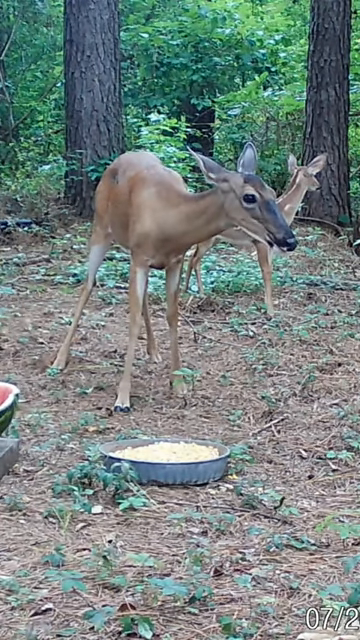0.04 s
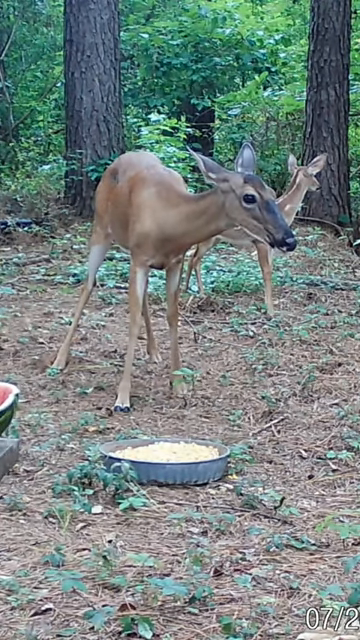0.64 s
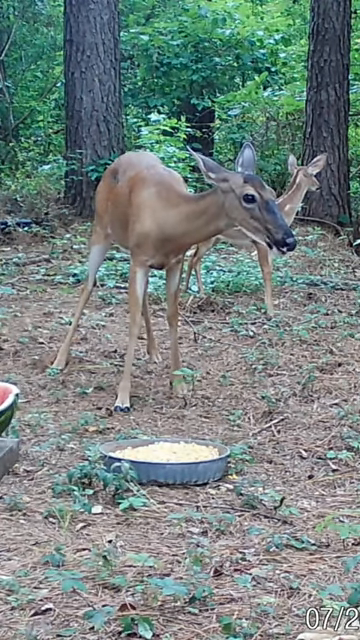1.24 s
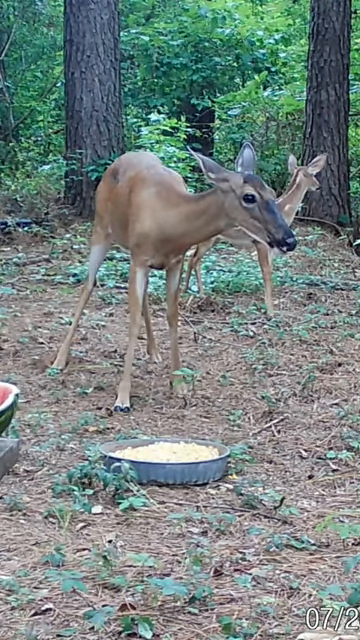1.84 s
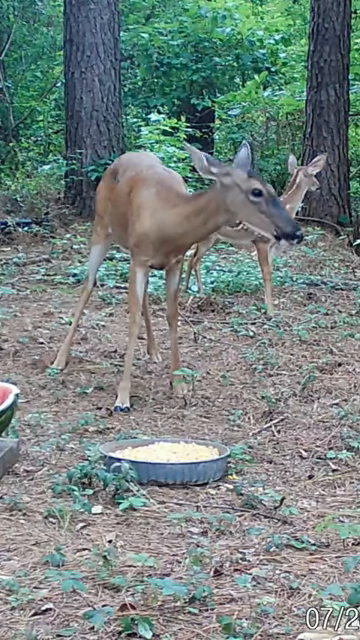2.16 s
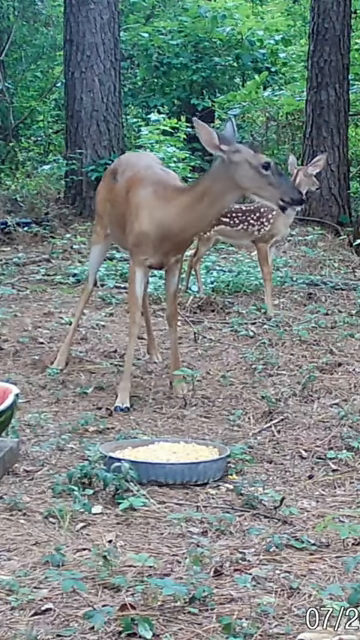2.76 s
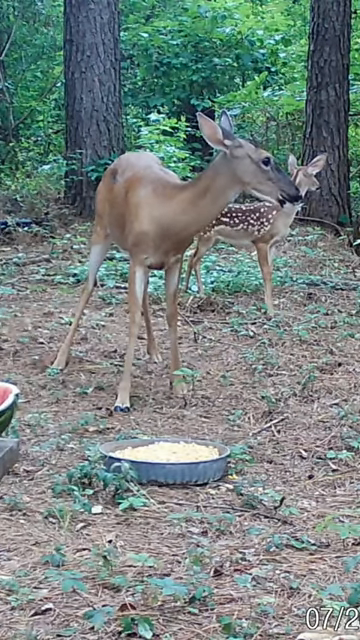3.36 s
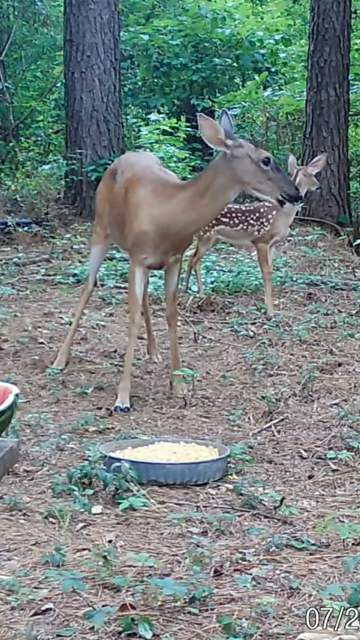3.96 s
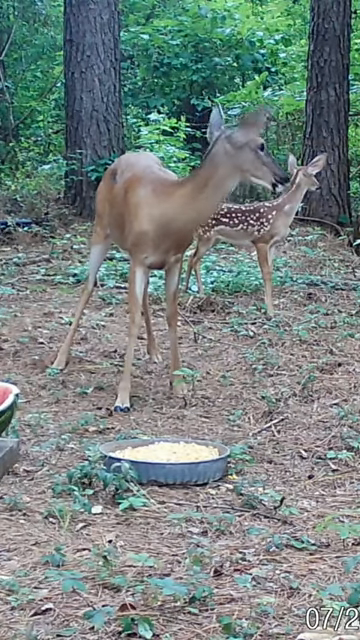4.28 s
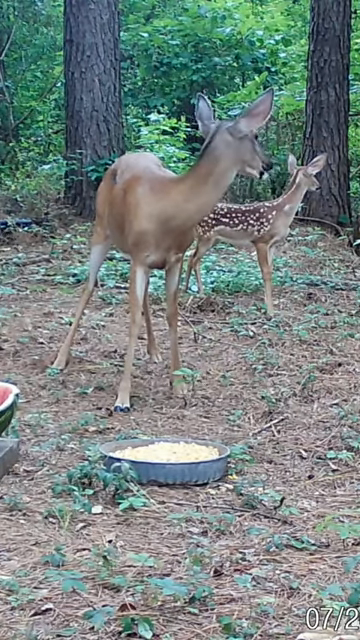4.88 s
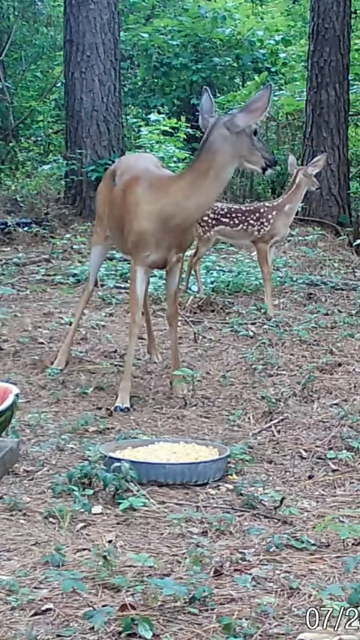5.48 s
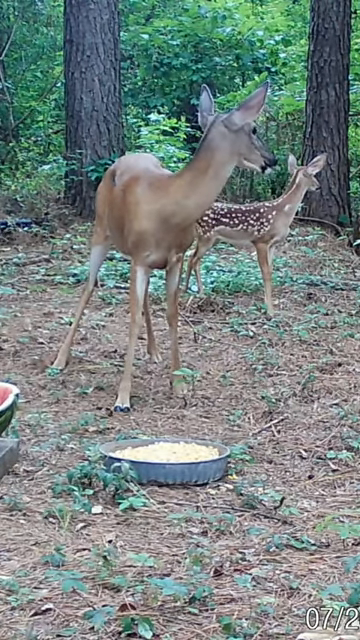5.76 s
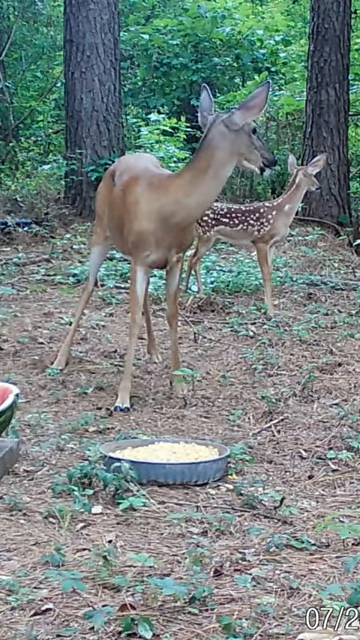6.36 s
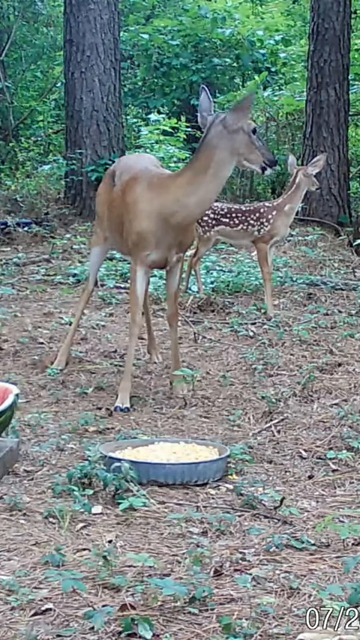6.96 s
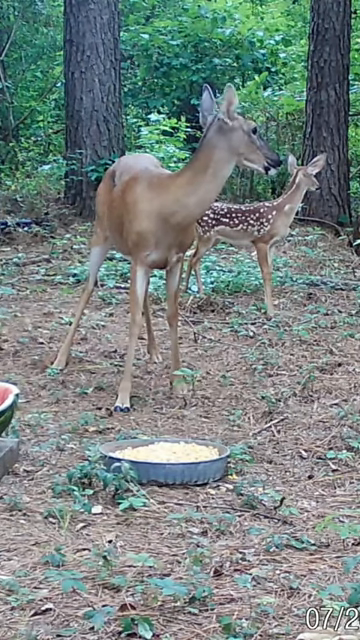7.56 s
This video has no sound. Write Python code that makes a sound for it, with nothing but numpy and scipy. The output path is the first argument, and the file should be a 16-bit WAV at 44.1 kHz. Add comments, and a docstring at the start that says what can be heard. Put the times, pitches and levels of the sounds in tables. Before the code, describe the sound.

A dense chorus of cicadas drones in summer woods for the whole seven and a half seconds, a high, even buzz blurred by the trees, over faint hiss and distant rumble. At 0.3 seconds a finger knocks dully on the hand-held phone, right at the microphone. A far twig cracks very faintly at about 1.1 seconds, and the case ticks at 1.8. Barely audible birds give falling whistles and chips from 1.6 to 2.9 seconds, then four quick raspy phrases until 4. A faint low hum swells and recedes around 4.6. From 5.6 seconds the grip shifts, with soft skin rubs, sharp clicks and small creaks. Hollow, close knocks begin around 6.5, with by far the loudest at 6.7 and several lighter ones between 7 and 7.2. The cicadas continue unchanged to the end.

```python
"""Summer woods, a hand-held phone as the microphone, mono. A chorus of cicadas drones evenly in the
trees, each insect clicking its tymbals to ring its abdomen. Right at the microphone a hand shifts:
the case knocks, ticks and creaks, mostly near the end, and skin rubs over it. Far off are a few
faint birds, one cracking twig and a low rumble."""
import sys
import numpy as np
from scipy import signal
from scipy.fft import rfft, irfft
from scipy.io import wavfile
from scipy.ndimage import uniform_filter1d

SR = 44100
rng = np.random.default_rng(int(sys.argv[2]) if len(sys.argv) > 2 else 0)


def digitize_waveform(pressure):
    """Quantize a signal to 16-bit integers and store it at the path in sys.argv[1].

    Rows of a 2-D input are taken as channels; values are limited to [-1, 1].
    """
    field = np.atleast_2d(pressure).T
    bounded = np.clip(field, -1, 1)
    quanta = np.round(bounded * 32767).astype(np.int16)
    wavfile.write(sys.argv[1], SR, quanta)


N = 340452
T = np.arange(N) / SR

# the chorus as it reaches the microphone through the leaves: f/Hz, relative level/dB
CHORUS_SPECTRUM = [(5000, -59), (5600, -23), (6000, -13.5), (6400, -6.5), (6860, -1), (7400, -7.5),
                   (7700, -17.5), (8200, -20), (9500, -34)]
def cicadas(count=30, clicks_per_s=260, abdomen_hz=6847, spread_hz=570, ring_s=0.00043, db=-46.5):
    """Each insect buckles its tymbals in fast clicks that ring its abdomen; distance blurs them."""
    groups, t = np.zeros((6, N)), T[:512]
    for k, detune in enumerate(np.linspace(-1, 1, count)):
        uneven = 1 + .03 * walk(4) + .05 * walk(150)
        rate = clicks_per_s * np.exp(.25 * rng.standard_normal()) * uneven
        clicks = np.diff(np.floor(np.cumsum(rate) / SR), prepend=0)
        ring = np.exp(-t / ring_s) * np.sin(2 * np.pi * (abdomen_hz + detune * spread_hz) * t)
        buzz = level(signal.oaconvolve(clicks, ring)[:N], 0)
        swell = undb(-0.65 * walk(1.0))
        groups[k % len(groups)] += buzz * swell
    # the insects of one tree share a path through the wood
    chorus = sum(trees(group, t60=0.68) for group in groups)
    return level(colour(chorus, CHORUS_SPECTRUM), db)


# knocks at the microphone: t/s, ring peak level/dB, favoured f/Hz, place (edge 0, back 1), crack level/dB
HAND_KNOCKS = [(0.3009, -30.5, 310, 0.045, -39), (0.3444, -43.5, 204, .16, -62),
               (5.702, -43, 280, .53, -45), (6.4638, -33, 230, 0.94, -32.5), (6.6449, -34.5, 390, .51, -43),
               (6.6819, -13, 444, 0.83, -26.5), (6.7302, -28, 510, 0.84, -49), (7.019, -29, 505, 0.55, -36),
               (7.061, -30.5, 464, 0.53, -43), (7.0928, -34, 486, 0.43, -47), (7.1376, -27, 348, 0.12, -45)]
def knocks(slip_db=-35, gap_s=0.0068, rise_db=9, fall_octaves=0.19):
    """Fingers bump the case; every push rings its modes and cracks dully on the shell."""
    out = np.zeros(N)
    for s, db, pitch_hz, place, crack_db in HAND_KNOCKS:
        # a hard press lands as a run of pushes, each stronger and lower than the last
        pushes = 1 + int(max(db - slip_db, 0) / rise_db)
        for early in range(pushes):
            ring = undb(db) * case_ring(pitch_hz * 2 ** (early * fall_octaves), place)
            crack = shell_slip(crack_db, tilt_db=-7.0, decay_s=0.0005, tail_db=-9.5, tail_s=0.0087)
            add(out, s - early * gap_s, undb(-early * rise_db) * (ring + crack))
    return out


# modes of the case: f/Hz, level/dB pushed at the edge, level/dB pushed on the back, t60/s
CASE_MODES = [(175, -2.5, -24, 0.13), (236.5, 1.5, -9.5, 0.1), (282.5, -18, 1, 0.15),
              (412.7, -14, 5, 0.051), (499.4, 4.5, -6.5, 0.043), (613, -20, -3, 0.044),
              (706, 1.5, -1.5, 0.028), (837, -24, -4, 0.059), (960, -8, -41, 0.04)]
def case_ring(pitch_hz, place, focus_db=7, push_s=0.0027):
    """One soft push rings the case, peak 1: place weights the modes, softness favours one pitch."""
    t, ring = T[:16384], 0
    for hz, edge_db, back_db, t60 in CASE_MODES:
        db = edge_db + place * (back_db - edge_db) - focus_db * np.log2(hz / pitch_hz) ** 2
        ring = ring + undb(db - 60 * t / t60) * np.sin(2 * np.pi * hz * t)
    # a fingertip passes on neither deep bass nor treble
    bass_cut = signal.butter(2, 185, "high", fs=SR, output="sos")
    treble_cut = signal.butter(6, 1000, fs=SR, output="sos")
    onset = 1 - np.exp(-t / push_s)
    ring = signal.sosfilt(np.vstack([bass_cut, treble_cut]), ring * onset)
    return ring / np.abs(ring).max()


# sharp clicks at the microphone: t/s, onset level/dB
CASE_CLICKS = [(1.824, -41.5), (5.801, -39), (5.812, -35), (5.8735, -32.5), (5.947, -41), (6.089, -45),
               (6.386, -39), (6.425, -24), (6.4537, -34)]
# duller creaks, just as close: t/s, onset level/dB, decay/s
CASE_CREAKS = [(5.812, -47.5, 0.013), (6.449, -44.5, .024), (6.503, -44, 0.0044), (6.613, -43.5, 0.0057),
               (6.66, -47, 0.037), (6.894, -50.5, .0045), (7.0543, -35, 0.0052), (7.099, -42, 0.0052),
               (7.131, -39.5, 0.017), (7.139, -26, 0.0036), (7.301, -45, 0.007), (7.325, -58, .05)]
def ticks_and_creaks():
    """The shell gives under the grip: at once in a bright click, or slowly in a duller creak."""
    out = np.zeros(N)
    for s, db in CASE_CLICKS:
        add(out, s, shell_slip(db, tilt_db=6.5, decay_s=0.00059, tail_db=-22, tail_s=0.013))
    for s, db, decay_s in CASE_CREAKS:
        add(out, s, shell_slip(db, tilt_db=-2.5, decay_s=decay_s, tail_db=-33, tail_s=.02))
    return out


# colour of sharp contacts on the shell: f/Hz, relative level/dB
SHELL_SPECTRUM = [(300, -4.5), (800, 3.5), (1100, -2.5), (1500, -9), (1900, 7.5), (2300, 1), (2950, -4.5),
                  (4250, -1.5), (5000, -2.5), (8200, -0.5), (9700, -19), (11000, -18), (12500, -37),
                  (16000, -30)]
def shell_slip(db, tilt_db, decay_s, tail_db, tail_s, grain_db=2):
    """The shell slips in a quickly fading burst of tiny uneven clicks, then settles in a faint tail."""
    t = T[:16384]
    noise, size = rng.standard_normal((2, len(t)))
    grains = level(noise * undb(grain_db * size), db)
    fade = np.exp(-t / decay_s) + undb(tail_db) * np.exp(-t / tail_s)
    return colour(grains * fade, SHELL_SPECTRUM, tilt_db)


# skin rubbing beside the microphone: t/s, length/s, level/dB, favoured f/Hz
SKIN_RUBS = [(3.03, 0.26, -60.5, 273), (3.611, 0.13, -61.5, 330), (4.198, 0.048, -62.5, 260),
             (4.99, 0.081, -64.5, 280), (5.582, .08, -61.5, 547), (5.678, 0.11, -57, 324),
             (5.792, 0.15, -57, 195), (6.38, 0.091, -55.5, 250), (6.449, 0.093, -46, 197),
             (7.12, 0.064, -45.5, 206), (7.302, 0.13, -61, 248)]
def scuffs(damping_s=0.0078, hiss_hz=1250, hiss_db=-14):
    """Sliding skin hisses faintly, stirs the case modes and damps them at once."""
    out = np.zeros(N)
    band = signal.butter(2, [hiss_hz / np.sqrt(2), hiss_hz * np.sqrt(2)], "band", fs=SR, output="sos")
    for s, length, db, pitch_hz in SKIN_RUBS:
        progress = np.linspace(0, 1, int(length * SR))
        quick_swell = np.sin(np.pi * progress ** 0.48)
        slips = rng.standard_normal(SR)[:len(progress)] * quick_swell
        ring = case_ring(pitch_hz, place=0.52, focus_db=7.5)[:2048] * np.exp(-T[:2048] / damping_s)
        add(out, s, level(signal.fftconvolve(slips, ring), db))
        add(out, s, level(signal.sosfilt(band, slips), db + hiss_db))
    return out


# one far bird's falling whistles: t/s, level/dB
BIRD_WHISTLES = [(1.6, -80), (2.02, -76), (2.32, -77), (2.72, -79)]
# another's high chips: t/s
BIRD_CHIPS = [1.986, 2.313]
def birds(song_s=3.023, phrase_s=.2325, echo_db=-3):
    """Three birds call from deep in the wood and echo among the trees."""
    out = np.zeros(N)
    for s, db in BIRD_WHISTLES:
        add(out, s, note(db, length_s=.16, start_hz=2230, end_hz=1755, rasp_hz=50))
    for s in BIRD_CHIPS:
        add(out, s, note(db=-72.5, length_s=.035, start_hz=3450, end_hz=3260, rasp_hz=12))
    # the third repeats a pip and a raspy slur, softer the first time
    for k, effort_db in enumerate([-4.5, 0, 0, 0]):
        s = song_s + k * phrase_s
        pip = note(-69.5 + effort_db, length_s=0.042, start_hz=2330, end_hz=2300, rasp_hz=15)
        slur = note(-74.5 + effort_db, length_s=0.2, start_hz=3000, end_hz=2640, rasp_hz=260)
        add(out, s, pip)
        add(out, s + .04, slur)
    return out + undb(echo_db) * trees(out, t60=1.0)


def note(db, length_s, start_hz, end_hz, rasp_hz):
    """One gliding bird note; a fast wobble of the pitch makes it raspy."""
    size = int(length_s * SR)
    hz = np.linspace(start_hz, end_hz, size) + rasp_hz * walk(700)[:size]
    return level(np.sin(2 * np.pi * np.cumsum(hz) / SR) * np.hanning(size), db)


def twig(s=1.135, hz=4800, width_hz=1500, decay_s=0.0037, db=-67):
    """A small dry twig cracks some way off."""
    out, t = np.zeros(N), T[:4096]
    band = signal.butter(2, [hz - width_hz / 2, hz + width_hz / 2], "band", fs=SR, output="sos")
    snap = rng.standard_normal(len(t)) * np.exp(-t / decay_s)
    add(out, s, level(signal.sosfilt(band, snap), db))
    return out


# distant rumble and even hiss: f/Hz, relative level/dB
AIR_SPECTRUM = [(20, -6), (33, 0.5), (47, 0.5), (68, -2), (100, -4.5), (200, -11.5), (330, -15), (700, -11),
                (1000, -17), (1500, -21.5), (2500, -25.5), (5000, -26.5), (10000, -28), (16000, -29)]
def air(hum_hz=66, hum_peak_s=4.6, hum_fade_s=0.86, whine_hz=11640):
    """Far rumble and hiss, a wavering low hum that swells and recedes, and a thin steady whine."""
    bed = level(colour(rng.standard_normal(N), AIR_SPECTRUM), db=-56.5)
    wavering_hz = hum_hz * (1 + 0.099 * walk(19))
    hum = np.sin(2 * np.pi * np.cumsum(wavering_hz) / SR) * undb(3.2 * walk(11))
    swell = 1 / np.hypot(1, (T - hum_peak_s) / hum_fade_s)
    whine = np.sin(2 * np.pi * whine_hz * T + .5 * walk(12))
    return bed + level(hum, db=-61) * swell + level(whine, db=-82)


def trees(x, t60):
    """Trunks and leaves scatter a sound into a dense fading tail."""
    tail = rng.standard_normal(N) * undb(-60 * T / t60)
    return irfft(rfft(x) * rfft(tail / np.linalg.norm(tail)), N)


def colour(x, points, tilt_db=0):
    """Causal filter through (f/Hz, level/dB) points, tilted per octave; white noise keeps its power."""
    hz, db = np.transpose(points)
    octave = np.log2(np.fft.rfftfreq(len(x), 1 / SR) + 1)
    curve_db = np.interp(octave, np.log2(hz), db + tilt_db * np.log2(hz))
    gain = level(undb(curve_db), 0)
    # folding the cepstrum gives minimum phase
    cepstrum = irfft(np.log(gain), len(x))
    cepstrum[1:] *= 2
    cepstrum[len(x) // 2:] = 0
    return irfft(rfft(x) * np.exp(rfft(cepstrum)), len(x))


def walk(rate):
    """Random wander of rms 1, turning rate times a second."""
    hold = int(SR / rate)
    steps = np.repeat(rng.standard_normal(N // hold + 1), hold)
    return level(uniform_filter1d(steps, hold)[:N], 0)


def undb(db):
    """Decibels to gain."""
    return 10 ** (np.asarray(db) / 20)


def level(x, db):
    """Scale to an rms level."""
    return x * undb(db) / np.sqrt(np.mean(x ** 2))


def add(out, s, x):
    """Mix x into out at time s."""
    i = int(s * SR)
    out[i:i + len(x)] += x[:max(N - i, 0)]


def scene():
    """The wood and the handling reach one microphone, fed to both channels."""
    wood = cicadas() + air() + birds() + twig()
    handling = knocks() + scuffs() + ticks_and_creaks()
    return np.tile(wood + handling, (2, 1))


def record(dry, top_hz=15850):
    """The phone cuts the top steeply."""
    return signal.sosfilt(signal.ellip(12, .1, 80, top_hz, fs=SR, output="sos"), dry)


dry = scene()
out = record(dry)
digitize_waveform(out)
```